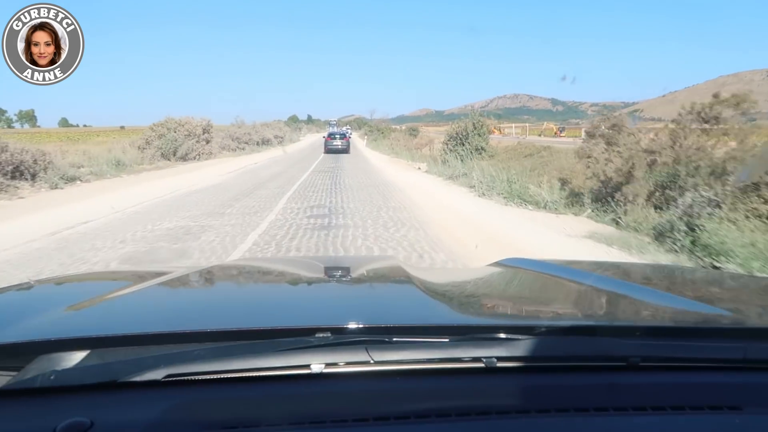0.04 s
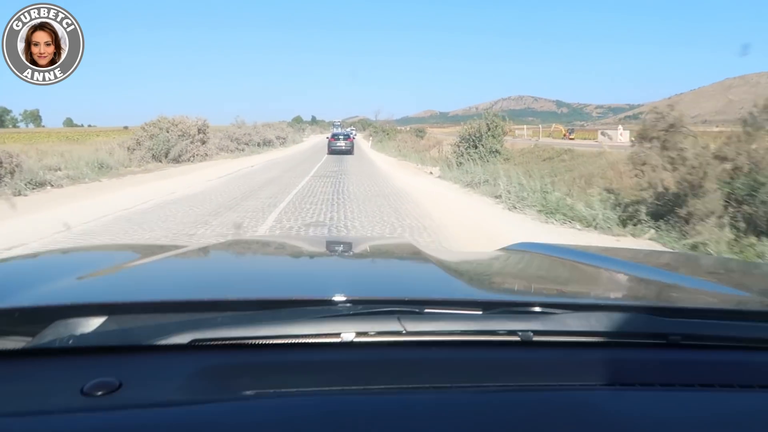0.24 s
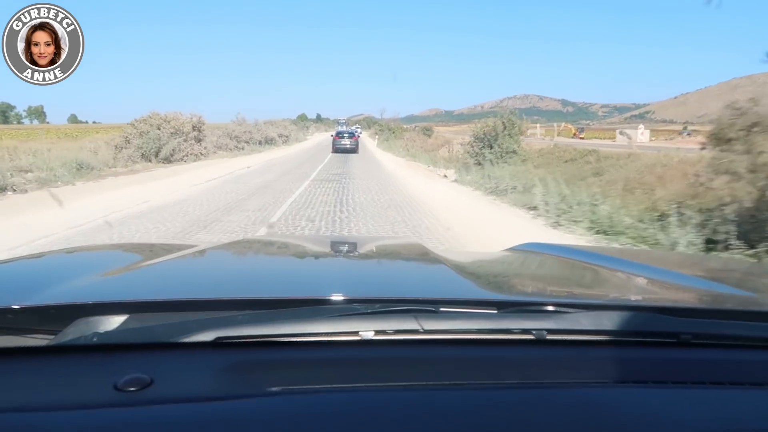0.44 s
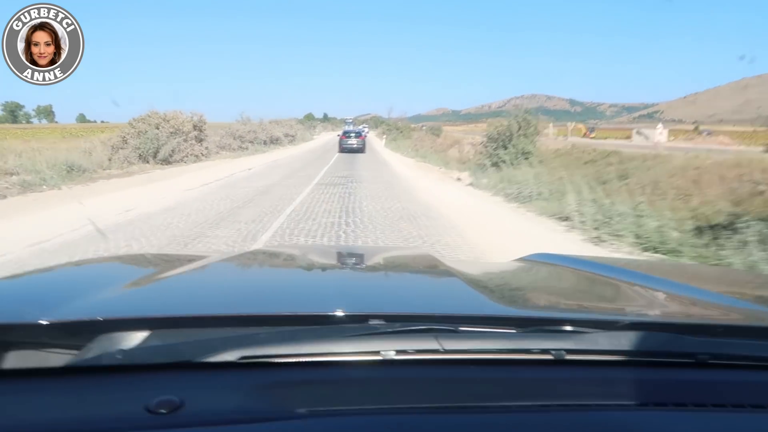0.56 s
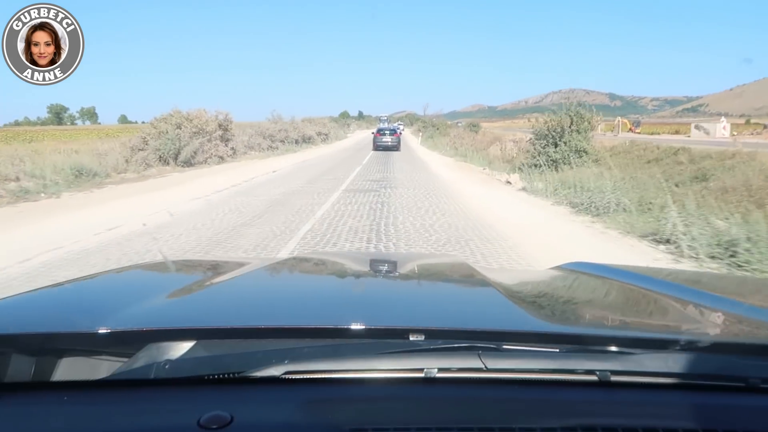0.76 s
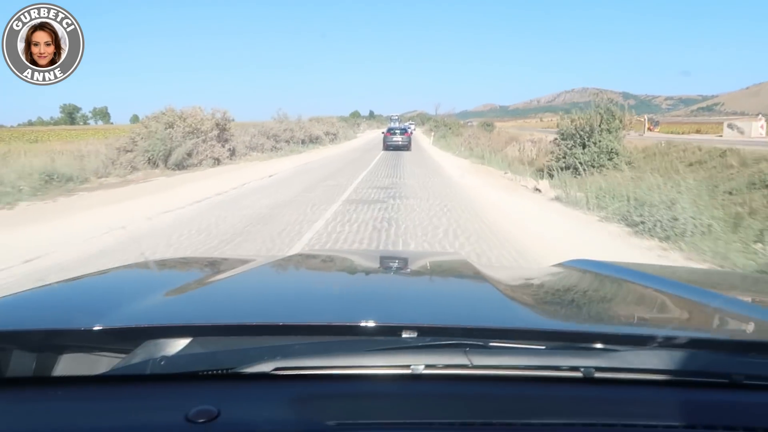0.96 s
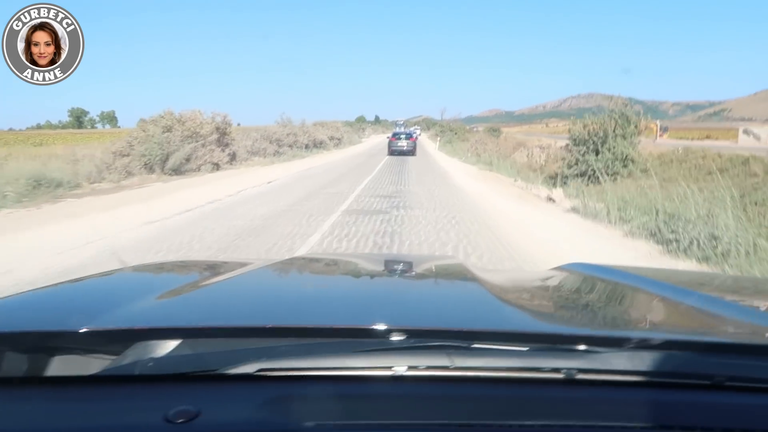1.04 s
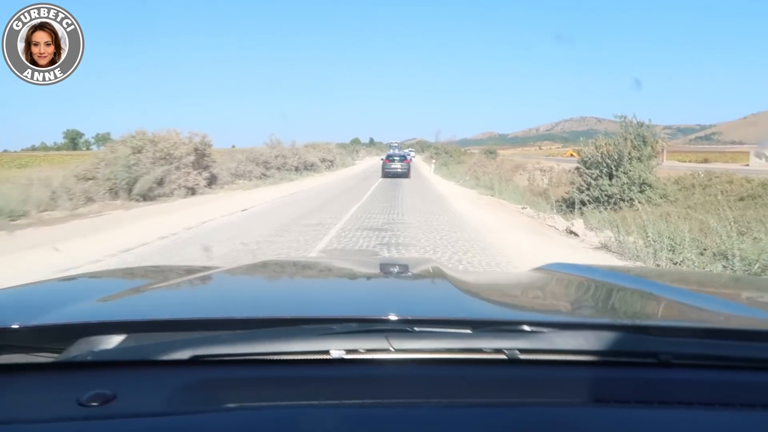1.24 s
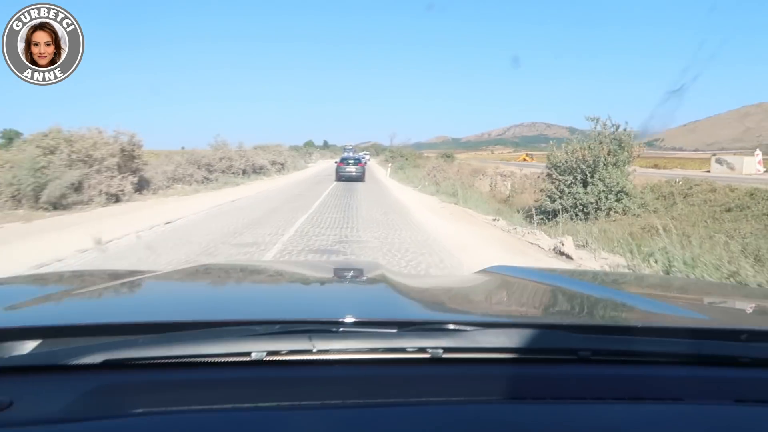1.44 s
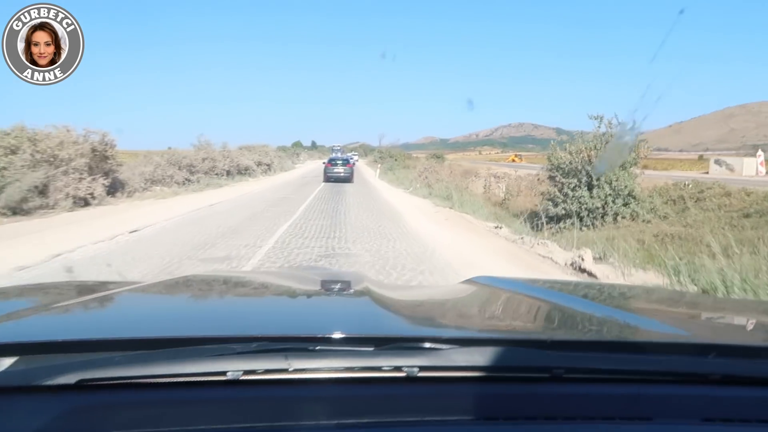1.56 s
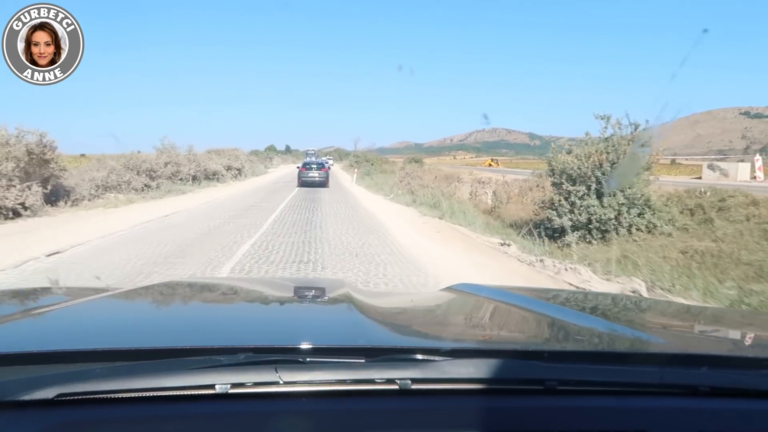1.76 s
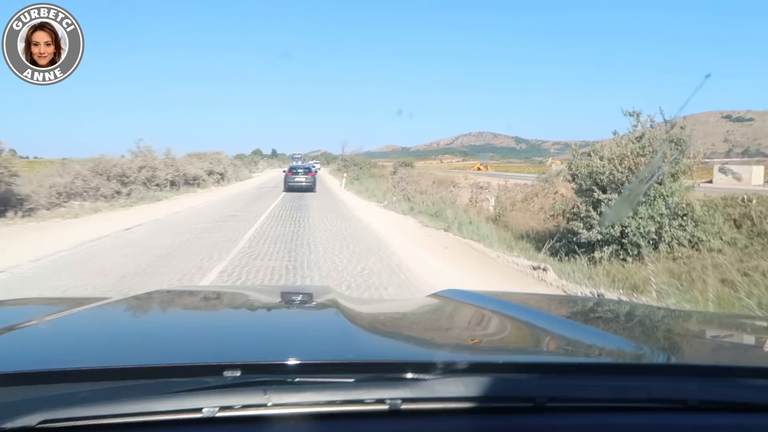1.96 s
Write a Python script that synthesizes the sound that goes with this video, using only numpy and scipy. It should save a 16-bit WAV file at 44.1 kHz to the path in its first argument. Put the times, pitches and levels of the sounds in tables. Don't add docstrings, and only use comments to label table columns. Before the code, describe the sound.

Deep, booming tyre rumble over a stone-block road fills a car cabin throughout; hollow knocks and plastic rattles crowd the first second, then thin out, heard by a close stereo microphone on the dash.

```python
import sys
import numpy as np
from scipy import signal
from scipy.fft import rfft, irfft, next_fast_len
from scipy.io import wavfile
from scipy.ndimage import uniform_filter1d, map_coordinates

SR = 44100
rng = np.random.default_rng(int(sys.argv[2]) if len(sys.argv) > 2 else 0)


def wav_out(sig):
    wavfile.write(sys.argv[1], SR, np.round(np.clip(np.atleast_2d(sig).T, -1, 1) * 32767).astype(np.int16))


def voltage_ratio(level):
    return 10 ** (np.asarray(level, float) / 20)


N = 88288


def unit(x):
    return x / np.sqrt(np.mean(x ** 2) + 1e-20)


def curves(rows):
    start_s, *columns = np.transpose(rows)
    return [np.interp(np.arange(N) / SR, start_s, column) for column in columns]


def wobble(rate):
    return map_coordinates(rng.standard_normal(400), [np.arange(N) * rate / SR])


def filtered(x, response):
    size = next_fast_len(N + SR // 2)
    hz = np.fft.rfftfreq(size, 1 / SR)
    return irfft(rfft(x, size) * response(hz), size)[..., :N]


def coloured(x, points):
    point_hz, point_db = np.transpose(points)

    def response(hz):
        return voltage_ratio(np.interp(np.log(hz + 1), np.log(point_hz + 1), point_db))

    return unit(filtered(x, response))


def resonant(x, peaks):
    def response(hz):
        total = 0
        for k, (centre, width, db) in enumerate(peaks):
            band = 1j * hz * width / (centre * centre - hz * hz + 1j * hz * width)
            total = total + (-1) ** k * voltage_ratio(db) * band
        return total

    return filtered(x, response)


def ringing(x, peaks):
    return resonant(resonant(x, peaks), peaks)


def soft(x):
    return filtered(x, lambda hz: 1 / (1 + 1j * hz / 4900) ** 2)


def sparse(rate, scatter_db, channels=1):
    hit = rng.random((channels, N)) < rate / SR
    sign = rng.choice([-1, 1], (channels, N))
    return hit * sign * voltage_ratio(scatter_db * rng.standard_normal((channels, N)))


def dying(t, peak_db, t60_s, attack_s):
    return voltage_ratio(peak_db - 60 * t / t60_s) * (1 - np.exp(-t / attack_s))


def bursts(start_s, peak_db, t60_s, attack_s):
    out, t = np.zeros(N + SR), np.arange(SR // 8) / SR
    for s, db in zip(start_s, peak_db):
        out[round(s * SR):][:len(t)] += dying(t, db, t60_s, attack_s)
    return out[:N]


def ports(mid, side):
    lag_s = 2e-5
    turn = np.array([[1], [-1]])
    pair = filtered(mid, lambda hz: np.exp(-1j * np.pi * hz * lag_s * turn))
    return pair + np.array([side, -side])


def grit():
    # start_s, peak_db
    ticks = [(0.0947, -50), (0.169, -64), (0.2394, -54.5), (0.349, -50), (0.502, -53), (0.542, -51.5),
             (0.5994, -46.5), (0.7144, -52.5), (1.0012, -50.5), (1.098, -55), (1.174, -51.5), (1.2317, -46),
             (1.245, -47), (1.2736, -49.5), (1.4594, -53.5), (1.6043, -52.5), (1.725, -49), (1.8105, -49)]
    # frequency_hz, level_db (per Hz)
    colour = [(1500, -21.5), (3500, -6), (6000, -2.5), (9000, -15), (14000, -20.5)]
    start_s, peak_db = np.transpose(ticks)
    fade = bursts(start_s, peak_db - 7, t60_s=0.095, attack_s=0.0015)
    grains = rng.standard_normal((2, N)) + 1.4 * sparse(1700, 4.4, channels=2)
    mid, side = fade * coloured(grains, colour)
    side = voltage_ratio(-0.5) * side
    return np.array([mid + side, mid - side])


def squeak():
    start_s, length_s, slip_hz = 1.048, 0.027, 405
    progress = np.clip((np.arange(N) / SR - start_s) / length_s, 0, 1)
    slips = np.diff(np.floor(progress * length_s * slip_hz), prepend=0)
    slips = slips * voltage_ratio(1.95 * rng.standard_normal(N))
    scraping = 0.06 * rng.standard_normal(N)
    pressure = np.abs(np.sin(np.pi * progress)) ** 0.6
    rubbing = soft(soft(soft((slips + scraping) * pressure)))
    panel = [(700, 340, -18), (1260, 400, 17), (1710, 160, -22), (2800, 350, 3.5)]
    sound = resonant(rubbing, panel)
    return voltage_ratio(-27) * sound / np.abs(sound).max() * voltage_ratio([[-1.2], [1.2]])


def trim():
    # start_s, peak_db, upper_db (share of the upper modes)
    rattles = [(0.0283, -37, -10), (0.0548, -37.5, -6), (0.0937, -34.5, -13.5), (0.1271, -61.5, -14),
               (0.167, -26, -10), (0.2225, -38, -5.5), (0.2379, -30.5, -7.5), (0.2588, -50.5, -2.5),
               (0.2987, -26.5, -10), (0.3437, -29, -8.5), (0.3674, -44, -2.5), (0.415, -22.5, -12.5),
               (0.4311, -48.5, -17.5), (0.4988, -23.5, -10), (0.5205, -47.5, -12), (0.5632, -29.5, -16.5),
               (0.5773, -25.5, -10.5), (0.6053, -31, -16.5), (0.6379, -34, -17), (0.6629, -28.5, -14),
               (0.7014, -33.5, -10.5), (0.795, -35.5, -15), (0.9614, -30.5, -16), (0.9996, -30, -7.5),
               (1.136, -33, -20), (1.1654, -43.5, -20.5), (1.2079, -34, -6.5), (1.242, -26, -16.5),
               (1.271, -27, -17.5), (1.331, -35.5, -12),
               (1.3525, -34.5, -15.5),
        (1.4612, -41, -16.5),
        (1.6072, -31, -22),
        (1.6394, -34, -12.5),
        (1.7255, -30.5, -15.5),
        (1.7564, -44.5, -10.5),
        (1.7927, -36.5, -9.5),
        (1.8094, -31, -9),
        (1.844, -38, -12),
        (1.9874, -37, -20),
    ]
    # pitch_hz, width_hz, level_db
    low_modes = [(880, 354, -2.5), (1331, 227, -1), (1802, 426, -5.5)]
    # pitch_hz, width_hz, level_db
    high_modes = [(2390, 470, 1), (3200, 220, 0), (3526, 700, -5.5), (6000, 1100, -9.5)]
    start_s, peak_db, upper_db = np.transpose(rattles)
    low_fade = bursts(start_s, peak_db, t60_s=0.074, attack_s=0.001)
    high_fade = bursts(start_s, peak_db + upper_db, t60_s=0.074, attack_s=0.001)
    ticks = sparse(1500, 2.7, channels=2) + 0.13 * rng.standard_normal((2, N))
    low = voltage_ratio(25) * ringing(ticks * low_fade, low_modes)
    high = voltage_ratio(26) * ringing(ticks * high_fade, high_modes)
    mid, side = soft(low + high)
    side = voltage_ratio(-14) * side
    pan_db = -1.6
    return np.array([mid + side, mid - side]) * voltage_ratio([[pan_db / 2], [-pan_db / 2]])


def mount():
    # start_s, peak_db, pitch_hz
    knocks = [(0.051, -21, 590), (0.099, -30, 597), (0.155, -29, 580), (0.276, -26.5, 624),
              (0.333, -24.5, 580), (0.397, -24.5, 605), (0.467, -22.5, 581), (0.5, -26.5, 633),
              (0.542, -20, 613), (0.586, -22.5, 546.3), (0.601, -47.5, 595), (0.628, -21.5, 594),
              (0.703, -20.5, 571.6), (0.791, -23, 582), (0.859, -27.5, 593), (0.954, -23, 582),
              (0.967, -30, 608), (1.035, -24.5, 600), (1.082, -28, 580), (1.13, -28.5, 593),
              (1.244, -26.5, 579.6), (1.267, -28.5, 586), (1.289, -31.5, 594), (1.324, -55, 615),
              (1.947, -30.5, 550)]
    out, t = np.zeros(N + SR), np.arange(SR // 10) / SR
    for s, db, hz in knocks:
        swing = np.sin(2 * np.pi * hz * t) + 0.3 * np.sin(2 * np.pi * 1.45 * hz * t)
        out[round(s * SR):][:len(t)] += dying(t, db + 4, t60_s=0.033, attack_s=0.001) * swing
    return ports(out[:N], np.zeros(N))


def shaking():
    # start_s, level_db
    shake = [(0.02, -49.5), (0.296, -51), (0.416, -45), (0.574, -41.5), (0.768, -48), (1.04, -48.5),
             (1.192, -52.5), (1.426, -52.5), (1.644, -48), (1.8, -53), (1.97, -48)]
    shake_db, = curves(shake)
    return shake_db - shake_db.mean()


def port_air(shake_db):
    # frequency_hz, level_db (per Hz)
    colour = [(40, -20.5), (120, -2), (250, -0.5), (600, -16), (2000, -24), (4000, -25.5), (8000, -30),
              (14000, -42.5)]
    level_db = -52 + 0.7 * shake_db + 1.4 * wobble(20)
    return voltage_ratio(level_db) * coloured(rng.standard_normal(N), colour)


def tyre_roar(shake_db):
    # frequency_hz, level_db (per Hz)
    colour = [(200, -35.5), (400, 1), (900, -11.5), (1400, -23), (2200, -27), (4000, -35.5), (8000, -51),
              (12000, -78.5)]
    level_db = -38.5 + 0.6 * shake_db + 2.72 * wobble(16)
    return voltage_ratio(level_db) * coloured(rng.standard_normal(N) + 1.5 * sparse(1500, 1.3)[0], colour)


def tone(rows, unsteady_db, drift):
    hz, db = curves(rows)
    phase = 2 * np.pi * np.cumsum(hz) / SR + drift * wobble(16)
    level_db = uniform_filter1d(db, size=900) + unsteady_db * wobble(11)
    return np.sqrt(2) * voltage_ratio(level_db) * np.sin(phase)


def boom_and_hum():
    # start_s, pitch_hz, level_db
    boom = [(0.0, 46.18, -18.5), (0.18, 45.5, -11), (0.33, 44.96, -19.5), (0.45, 40.68, -25),
            (0.59, 41.27, -11.5), (0.82, 39.56, -16), (1.07, 42.7, -14), (1.28, 42.15, -15),
            (1.32, 42.93, -29.5), (1.56, 39.59, -35), (1.69, 46.53, -22.5), (1.79, 44.26, -21.5),
            (2.0, 44.63, -16.5)]
    # start_s, pitch_hz, level_db
    hum = [(0.0, 77.8, -48), (0.08, 71.35, -20.5), (0.14, 76.3, -17), (0.25, 62.51, -22.5),
           (0.46, 67.78, -25.5), (0.55, 62.58, -18), (0.87, 71.53, -28), (0.98, 66.5, -33),
           (1.1, 74.93, -27), (1.24, 66.2, -17.5), (1.32, 71.05, -31.5), (1.92, 78.8, -15.5),
           (2.0, 76.7, -23)]
    return tone(boom, unsteady_db=3.5, drift=1.07) + tone(hum, unsteady_db=2.0, drift=1.53)


def block_thumps():
    # start_s, level_db, sharp_db (sharpness of the block edges)
    roughness = [
        (0.0, -26.5, -3.5),
        (0.54, -21, -11),
        (0.56, -21.5, -6),
        (0.88, -25.5, -10),
        (1.29, -19.5, -10),
        (1.41, -24, -7.5),
        (1.53, -20, -9.5),
        (1.55, -26, -3),
        (1.93, -24, -6),
        (2.0, -23.5, -3.5),
    ]
    # frequency_hz, level_db (per Hz)
    body = [(10, -52), (25, -9), (45, 7), (75, 1), (110, 0), (220, -7), (350, -16), (600, -65.5)]
    level_db, sharp_db = curves(roughness)
    blocks = sparse(290, 4)[0] + 0.18 * rng.standard_normal(N)
    thumps = coloured(blocks, body)
    upper = filtered(thumps, lambda hz: 1 / (1 + (177 / (hz + 1)) ** 6))
    sharpness = voltage_ratio(sharp_db - sharp_db.mean()) - 1
    return voltage_ratio(level_db + 4.5 + 1.2 * wobble(8.385)) * (thumps + sharpness * upper)


def road():
    shake_db = shaking()
    mid = boom_and_hum() + block_thumps() + tyre_roar(shake_db)
    return ports(mid, port_air(shake_db))


def scene():
    return grit() + squeak() + trim() + mount() + road()


def band_limit(x):
    return signal.sosfilt(signal.butter(12, 14900, fs=SR, output="sos"), x)


def record(dry):
    mid, side = dry.mean(0), (dry[0] - dry[1]) / 2
    mid = filtered(mid, lambda hz: 1 / (1 + (hz / 10940) ** 13))
    mix = np.array([mid + side, mid - side])
    return band_limit(mix)


dry = scene()
out = record(dry)
wav_out(out)
```